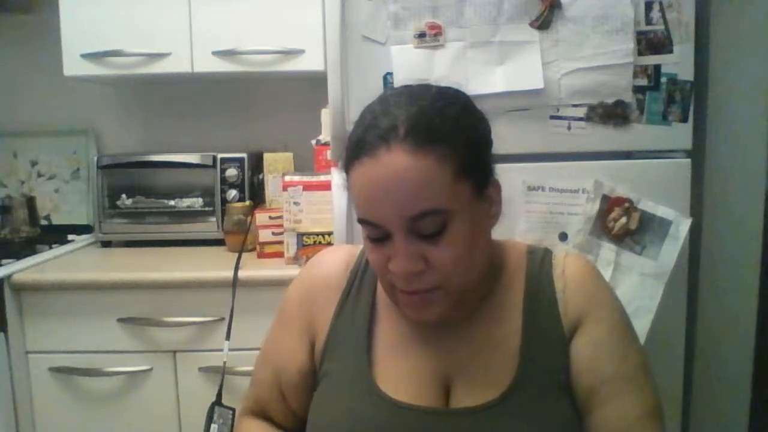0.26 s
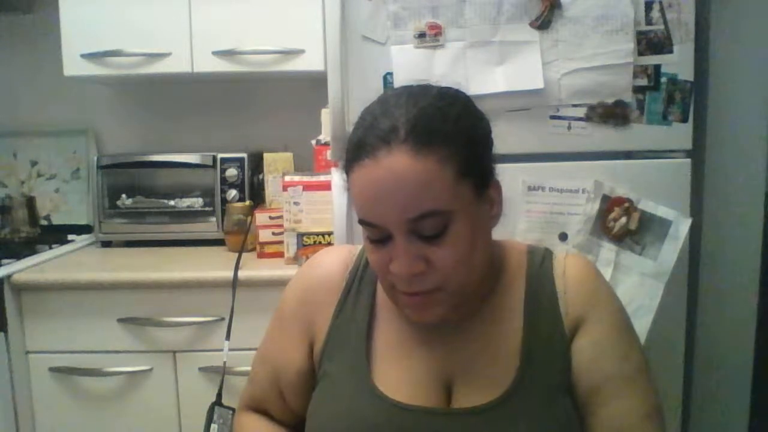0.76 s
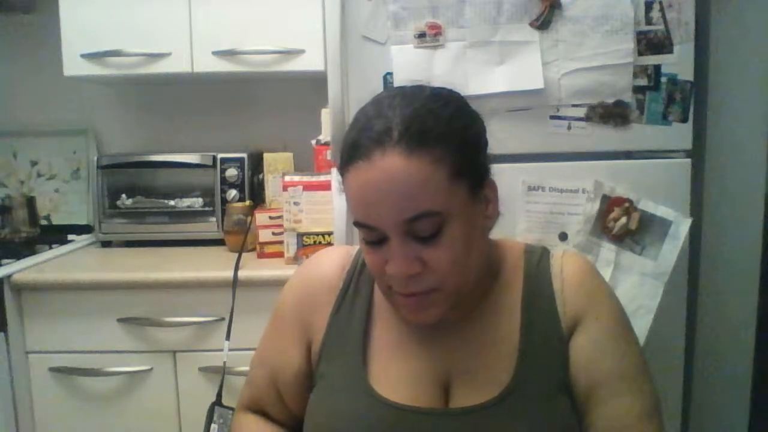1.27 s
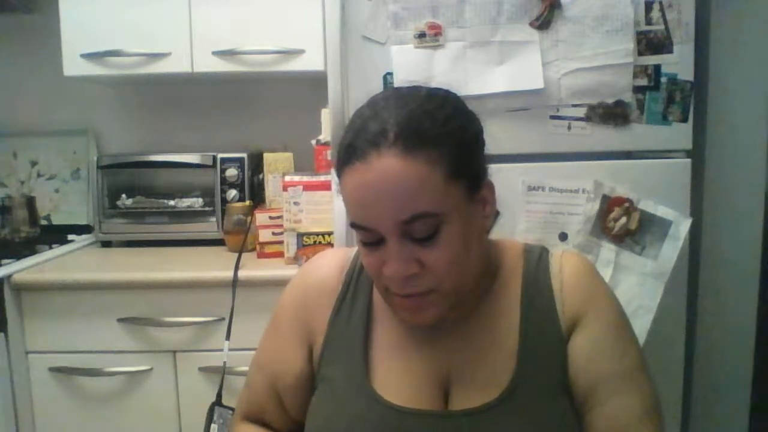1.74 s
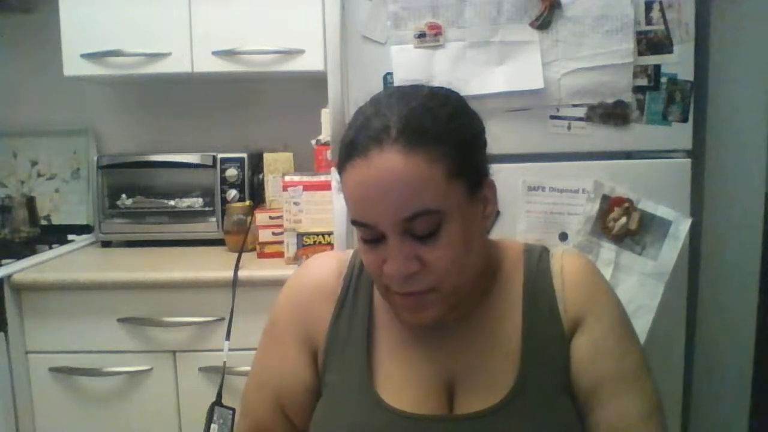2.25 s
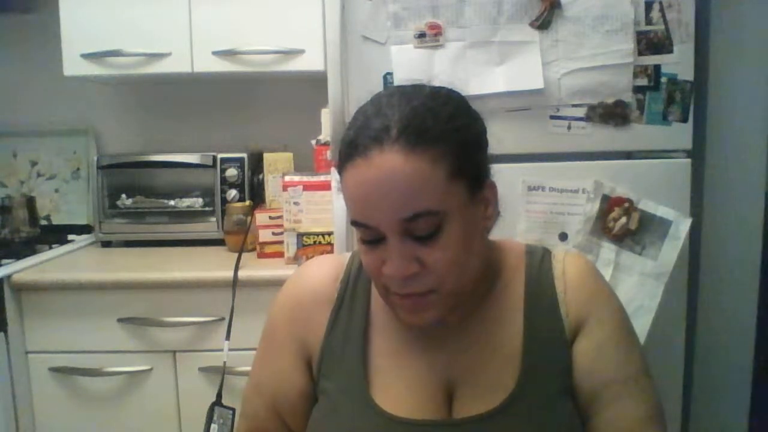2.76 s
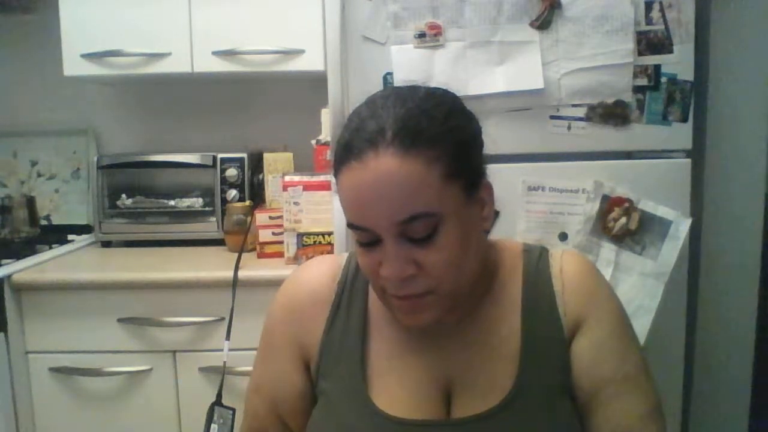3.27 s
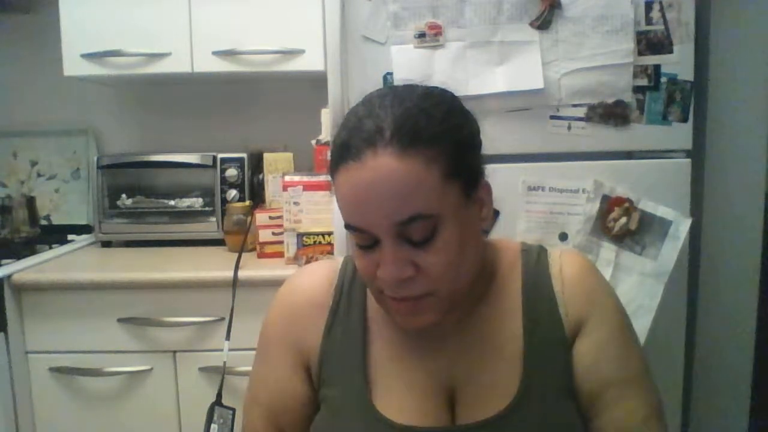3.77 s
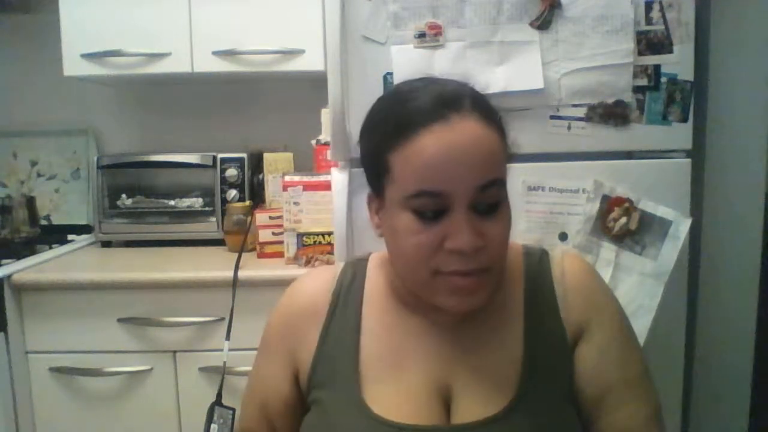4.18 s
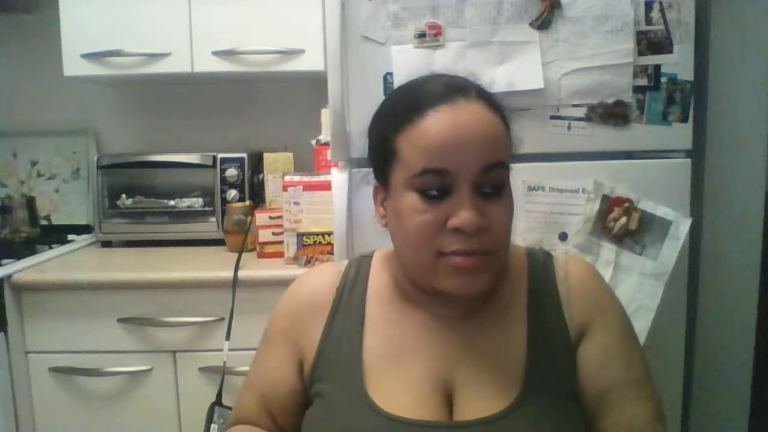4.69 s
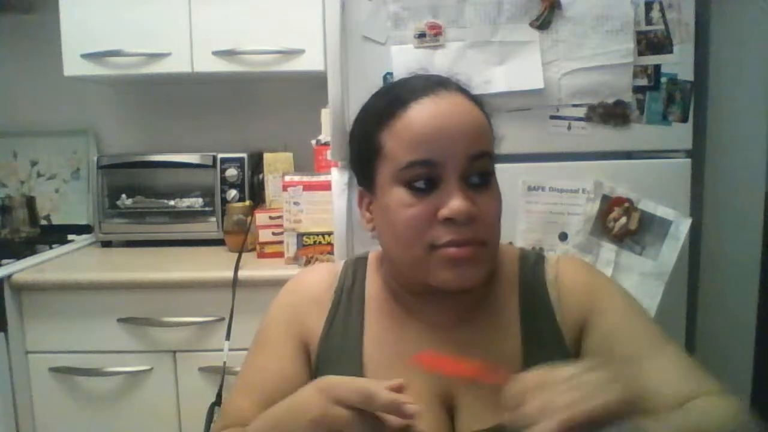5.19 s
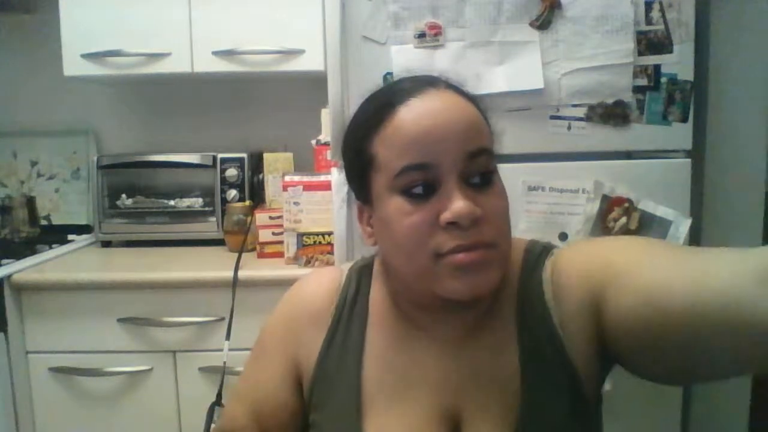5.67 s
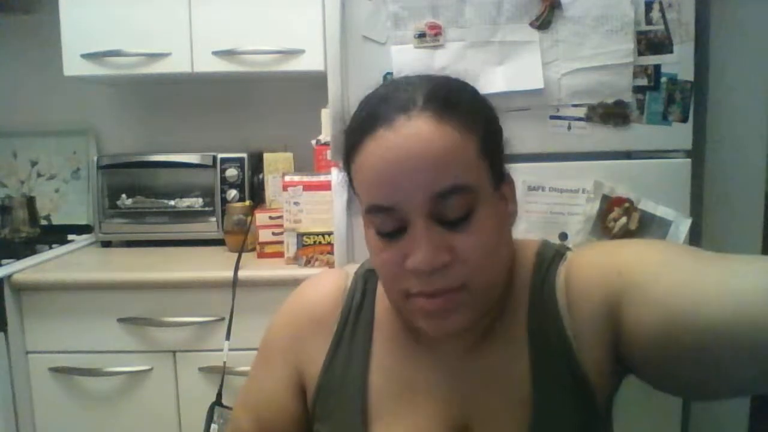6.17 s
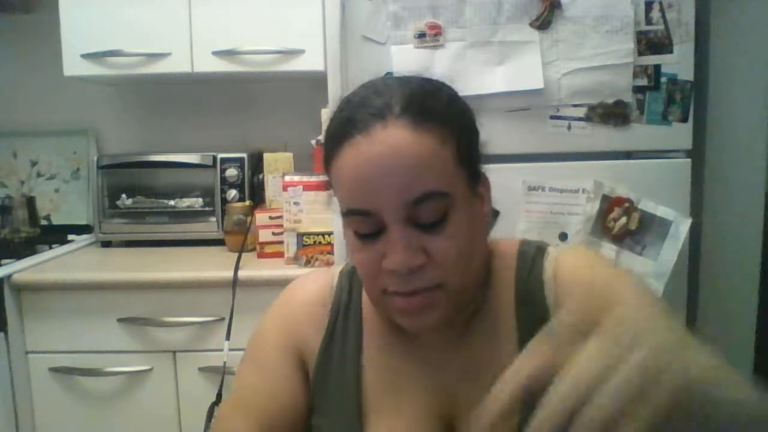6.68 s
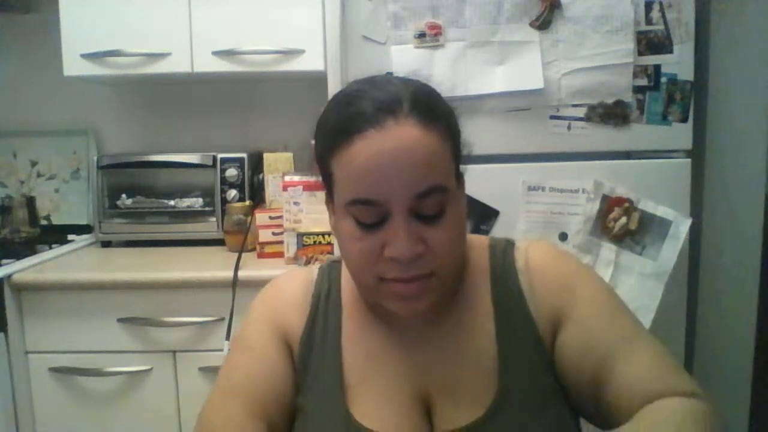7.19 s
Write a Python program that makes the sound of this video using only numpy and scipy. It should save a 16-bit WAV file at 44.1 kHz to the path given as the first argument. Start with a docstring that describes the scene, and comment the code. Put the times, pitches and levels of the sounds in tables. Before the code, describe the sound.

A faint steady whirr fills a small, fairly live kitchen, heard through a microphone with little treble. At first a scissor tip scratches lightly over a taped cardboard box, with a sharp tick at about 1.4 seconds. From 1.7 seconds the blade softly slits the tape, amid dull, hollow knocks on the box, and snips shut near 3 seconds. At 3.5 seconds the last strip pulls tight, then breaks at 3.7 with a snap and thump, the loudest moment. From 3.9 to 4.5 seconds the flaps are dragged open, juddering, squeaking and rasping. A lull follows. Around 6 seconds the scissors are laid aside, with low table thuds, small clicks and an arm brushing the surface. A flap clacks near 6.8 seconds and the box is knocked. From 6.9 seconds hands rummage in crackling paper packing while a cardboard fold creaks, until about 7.5 seconds.

```python
"""A small, fairly live kitchen with a faint steady whirr, heard through a microphone with little treble.
On the table, scissors slit the tape on a cardboard box; the last strip snaps, the flaps are dragged open.
The scissors are laid aside; then hands knock the box and rummage in its paper packing.
Rubbing is a stream of tiny slips as fibres catch and let go, each one shaking the card and the box.
Knocks, ticks and creaks are short blows that leave the card or the blades ringing."""
import sys
import numpy as np
from scipy import signal
from scipy.io import wavfile

SR = 44100
rng = np.random.default_rng(int(sys.argv[2]) if len(sys.argv) > 2 else 0)


def dump_mix(stems):
    """Bounce the given channels to the path in sys.argv[1] as a 16-bit WAV at rate SR."""
    frames = np.atleast_2d(stems).T  # one column per channel
    limited = np.clip(frames, -1, 1)  # hard clip at full scale
    pcm = np.round(limited * 32767).astype(np.int16)
    wavfile.write(sys.argv[1], SR, pcm)


N = 328090
TIME = np.arange(N) / SR
RING_TIME = np.arange(SR // 3) / SR  # seconds since a blow


def amp(db):
    """Turns decibels into a number to multiply a sound by."""
    return 10 ** (np.asarray(db) / 20)


def unit(x):
    """Scales a sound to an average (rms) size of 1."""
    return x / np.sqrt(np.mean(x ** 2) + 1e-20)


def read(points, hz):
    """Looks up a pitch in a table, blending between rows on a musical (log) scale."""
    pitches, values = np.transpose(points)
    return np.interp(np.log(hz + 1), np.log(pitches + 1), values)


def add(mix, start_s, sound):
    """Mixes a sound in at the given time."""
    part = mix[max(round(start_s * SR), 0):][:len(sound)]
    part += sound[:len(part)]


def colour(x, tone, size=4096):
    """Makes each pitch louder or softer, following rows of pitch in Hz and gain in dB."""
    hz = abs(np.fft.fftfreq(size, 1 / SR))
    log_gain = np.log(amp(np.maximum(read(tone, hz), -100)))
    response = np.exp(np.conj(signal.hilbert(log_gain)))  # rings after a click, never before it
    taps = np.fft.ifft(response).real[:size // 2]
    return signal.oaconvolve(x, taps)[:len(x)]


def wander(length, turns_per_s):
    """A random curve that glides up and down, with an average size of 1."""
    points = rng.standard_normal(4096)
    return unit(np.interp(np.arange(length) / SR * turns_per_s, np.arange(len(points)), points))


def ring(modes, rise_s):
    """A struck thing sounds a few tones (modes); each drops 60 dB over its ring time."""
    wave = sum(amp(db - 60 * RING_TIME / ring_s) * np.sin(2 * np.pi * (hz * RING_TIME + k / np.e))
               for k, (hz, db, ring_s) in enumerate(modes))
    wave = wave * (1 - np.exp(-(RING_TIME / rise_s) ** 2))
    return wave / abs(wave).max()


def strike(blows, modes, focus_db, rise_s, detune=0.038, spot_db=3):
    """Each blow rings an object; its tones lose focus_db per octave away from the favoured pitch."""
    out = np.zeros(N)
    hz, mode_db, ring_s = np.transpose(modes)
    for start, db, favoured_hz in blows:
        grip, spot = rng.standard_normal((2, len(modes)))  # how it is held, where it is hit
        weight_db = mode_db + spot_db * spot - abs(focus_db * np.log2(hz / favoured_hz))
        add(out, start, amp(db) * ring(zip(hz * (1 + detune * grip), weight_db, ring_s), rise_s))
    return out


def envelope(t, start, swell, hold, fade_db_per_s):
    """The hand builds up pressure, keeps it, and eases off."""
    age = t - start
    rising = np.clip(age / max(swell, 1 / SR), 0, 1) ** 2
    return rising * amp(-fade_db_per_s * np.maximum(age - swell - hold, 0))


def span(rows, fade_db_per_s):
    """The times from the first stroke until the last has faded by 60 dB."""
    start, swell, hold = np.transpose(rows)[:3]
    end = max(start + swell + hold) + 60 / fade_db_per_s
    return TIME[max(round(min(start) * SR), 0):round(end * SR)]


def table_echo(x):
    """An echo off the table top; its delay drifts as the point of contact moves."""
    t = np.arange(len(x)) / SR
    delay_s = .0014 * (1 + .12 * wander(len(x), 11))
    return x + .6 * np.interp(t - delay_s, t, x)


def bend(x, flex):
    """Card bending under the hand shifts its pitches by the small fraction flex."""
    t = np.arange(len(x)) / SR
    shift_s = np.cumsum(flex * wander(len(x), 14)) / SR
    return np.interp(t + shift_s, t, x, period=len(x) / SR)


# The hiss of fibres and the boom of the hollow box. Each row: pitch in Hz, strength in dB.
HISS_TONE = [(2000, -19), (3300, -1), (4300, -0.5), (5500, -0.5), (6800, -4), (8000, -4.5)]
BOOM_TONE = [(90, -50.5), (170, -19.5), (232, 5.5), (265, -4.5), (305, 4), (360, 4.5), (412, 8.5),
             (470, -9.5), (540, -14.5), (900, -53)]
def rub(rows, tone, fade_db_per_s, slips_per_s, spread_db, smooth, clump_db, flex=0,
        judder=0, judder_hz=200, hiss_tone=HISS_TONE, boom_db_per_s=0, boom_db_per_octave=0):
    """Fibres catch and let go in clumps; the slips make the card scrape, the box boom and a fine hiss."""
    t = span(rows, fade_db_per_s)
    slipping = rng.random(len(t)) < slips_per_s / SR
    size = amp(spread_db * np.minimum(rng.exponential(1, len(t)), 3))
    noise = rng.standard_normal(len(t))
    drive = unit(unit(slipping * np.sign(noise) * size) + smooth * noise)
    # an edge that sticks and slips bunches the sound into uneven pulses
    cycles = np.cumsum(judder_hz * (1 + 0.245 * wander(len(t), 70))) / SR
    pulses = np.exp(judder * np.cos(2 * np.pi * cycles))
    clumps = amp(clump_db * wander(len(t), 79.45))
    drive = table_echo(drive * pulses * clumps)
    power = np.zeros((3, len(t)))
    for start, swell, hold, level_db, boom_db, hiss_db in rows:
        scrape = amp(level_db) * envelope(t, start, swell, hold, fade_db_per_s)
        # a lifting flap lets out more and more of the boom
        boom = scrape * amp(boom_db + boom_db_per_s * np.clip(t - start - swell, 0, hold))
        power += np.square([scrape, boom, scrape * amp(hiss_db)])
    # an open box booms higher than a closed one
    boom_tone = [(hz, db + boom_db_per_octave * np.log2(hz / BOOM_TONE[0][0])) for hz, db in BOOM_TONE]
    voices = bend(colour(drive, tone), flex), colour(drive, boom_tone), colour(drive, hiss_tone)
    out = np.zeros(N)
    add(out, t[0], sum(unit(voice) * np.sqrt(p) for voice, p in zip(voices, power)))
    return out


def resonate(x, hz, width_hz):
    """Keeps a narrow band around a moving pitch: shift it down to zero, smooth twice, shift back."""
    turn = np.exp(2j * np.pi * np.cumsum(hz) / SR)
    r = np.exp(-np.pi * width_hz / SR)
    return (turn * signal.lfilter([(1 - r) ** 2], [1, -2 * r, r * r], x / turn)).real


def sing(rows, notes, fade_db_per_s, sag_per_s=0):
    """Rubbing feeds a few narrow notes, which can sag in pitch as the edge slides on."""
    out = np.zeros(N)
    for row in rows:
        start, swell, hold, level_db, pitch = row
        t = span([row], fade_db_per_s)
        noise = rng.standard_normal(len(t))
        glide = pitch * np.exp(-sag_per_s * (t - start))
        sound = unit(sum(amp(db) * unit(resonate(noise, hz * glide, width)) for hz, width, db in notes))
        add(out, t[0], sound * amp(level_db) * envelope(t, start, swell, hold, fade_db_per_s))
    return out


# The kitchen's steady air. Each row: pitch in Hz, strength in dB.
AIR_TONE = [(25, 0), (50, -53), (85, 4.5), (150, -2.5), (230, -0.5), (400, -7), (600, -8.5), (800, -8),
            (890, 2.5), (1080, -8.5), (1300, -6), (1900, -16), (3000, -24.5), (7000, -27)]
def air():
    """A faint, slightly wavering whirr."""
    return amp(-54) * unit(colour(rng.standard_normal(N), AIR_TONE)) * amp(.6 * wander(N, 21))


# How long the room echoes. Each row: pitch in Hz, seconds to fade by 60 dB.
ECHO_TIMES = [(150, 0.1), (400, 0.24), (1040, 0.2), (2760, 0.23), (7000, 0.17)]
def kitchen(x, echo_db):
    """Adds dense echoes from walls and cupboards, each pitch dying at its own speed."""
    echoes, slot = np.zeros(SR // 2), 12  # one echo in every 12 samples
    at = np.arange(0, len(echoes) - slot, slot)
    echoes[at + rng.integers(0, slot, len(at))] = rng.choice([-1, 1], len(at))
    hz, t, spectrum = signal.stft(echoes, SR, nperseg=256)
    fade = amp(-60 * t / read(ECHO_TIMES, hz)[:, None])
    tail = signal.istft(spectrum * fade, SR, nperseg=256)[1]
    out = x.copy()
    add(out, .004, amp(echo_db) * signal.fftconvolve(x, tail / np.linalg.norm(tail)))
    return out / np.hypot(1, amp(echo_db))


# Thuds of the table top. Each row: start in seconds, level in dB, pitch in Hz.
THUDS = [(3.652, -28, 120.4), (4.292, -29, 105), (4.447, -41.5, 124.4), (5.983, -28, 120),
         (6.032, -24.5, 85.4), (6.103, -35, 99), (6.436, -30.5, 83), (6.487, -35.5, 89.3)]
def table_thuds():
    """Weight shifting on the table makes its top sway at a low pitch."""
    out = np.zeros(N)
    for start, db, hz in THUDS:
        add(out, start, amp(db) * ring([(hz, 0, .25), (hz * 1.6, -10, .12)], rise_s=.014))
    return out


# Sweeps of an arm. Each row: start, swell and hold in seconds, scrape level in dB, then boom and
# hiss in dB compared with the scrape. All the STROKES tables are laid out this way.
ARM_STROKES = [(5.895, 0.039, 0.11, -46, 4.5, -9.5), (6.02, 0.012, 0.013, -43.5, 3.5, 1),
               (6.068, 0.02, 0.0065, -28.5, -5, -10.5), (6.185, 0.027, 0.057, -42.5, -19.5, 7),
               (6.22, 0.0035, 0.044, -36, -19, -16), (6.315, 0.013, 0.068, -41.5, 7.5, 0),
               (6.66, 0.042, 0.056, -47.5, 1, -0.5), (6.74, 0.0056, 0.019, -28.5, 1, -5)]
# The rubbed table. Each row, as in all TONE tables: pitch in Hz, strength in dB.
TABLE_TONE = [(400, -34), (560, -7.5), (710, 6.5), (843, -23), (1050, 4), (1400, 0.5), (1850, 4),
              (2300, -4), (3400, -15.5), (4400, -63)]
def arm_brush():
    """An arm brushes over the table."""
    return rub(ARM_STROKES, TABLE_TONE, fade_db_per_s=480, slips_per_s=800, spread_db=3,
               smooth=.3, clump_db=2, flex=.04)


# Hands moving in the packing, and the tone of its paper.
PAPER_STROKES = [(6.907, 0.024, 0.14, -30, 3, -5.5), (7.05, 0.027, 0.1, -25.5, -1, -6.5),
                 (7.2, 0.0077, 0.068, -32.5, -8, -6.5), (7.255, 0.021, 0.058, -27.5, 0.5, -5.5),
                 (7.355, 0.013, 0.072, -34, 1.5, -1)]
PAPER_TONE = [(320, -40.5), (550, -8), (686, -0.5), (781, -11.5), (856, -15.5), (959, -33), (1030, 0.5),
              (1170, -4.5), (1360, -2.5), (1780, -7.5), (1930, -7), (2920, -10.5), (3400, -20), (4420, -68)]
def paper_packing():
    """Paper crackles as hands rummage in it."""
    return rub(PAPER_STROKES, PAPER_TONE, fade_db_per_s=350, slips_per_s=950, spread_db=3.3,
               smooth=.22, clump_db=1.9, flex=.022)


# Dull knocks. Each row, as in all BLOWS tables: start in seconds, level in dB, favoured pitch in Hz.
BOX_BLOWS = [(0.552, -26.5, 404), (1.441, -24.5, 387), (1.713, -32, 395), (2.165, -22, 310),
             (2.482, -31, 237), (2.667, -20.5, 407), (2.764, -24.5, 415), (2.932, -23, 250),
             (2.995, -21.5, 407), (3.337, -33.5, 422), (3.482, -9, 320), (3.556, -14, 260),
             (3.608, -13, 234), (3.655, -6, 222), (3.707, -7, 314), (4.158, -23.5, 395),
             (4.297, -22.5, 390), (5.936, -29, 303), (5.987, -19.5, 224), (6.745, -20, 315),
             (6.766, -22.5, 507), (6.8854, -11, 317)]
# The ringing box. Each row, as in all MODES tables: pitch in Hz, level in dB, ring time in seconds.
BOX_MODES = [(190, -13, .08), (240, 1, .12), (290, -1, .07), (345, -7, .05), (412, -1, .11),
             (660, -16, .06), (1360, -17, .07)]
def box_knocks():
    """Each blow dents a patch of card, which swings briefly at its own pitch; the box rings after it."""
    out = amp(-4) * strike(BOX_BLOWS, BOX_MODES, focus_db=9, rise_s=.003, detune=.035)
    dent_ring_s = 0.048
    for start, db, hz in BOX_BLOWS:
        dent = ring([(hz, 0, dent_ring_s), (hz * 2.1, -13, dent_ring_s / 2)], rise_s=0.0037)
        add(out, start, amp(db) * dent)
    return colour(out, [(60, -19.5), (190, -1)])  # the knocks carry little deep bass


# When a wall hums. Each row, as in all SONG tables: start, swell and hold in seconds, level in dB,
# and a number that multiplies the pitch.
WALL_SONG = [(1.79, 0.025, 0.19, -48, 0.55), (1.9, 0.036, 0.23, -48, 0.89),
             (2.32, 0.015, 0.19, -52.5, 0.63), (3.272, .012, 0.076, -39.5, 1.03),
             (4.61, 0.026, .19, -49.5, 0.48)]
# The wall's note. Each row, as in all NOTES tables: pitch in Hz, width in Hz, level in dB.
WALL_NOTES = [(410, 75, 0)]
def wall_hum():
    """A wall of the box hums as it is rubbed."""
    return sing(WALL_SONG, WALL_NOTES, fade_db_per_s=199)


# The jerks of a fold, and the ringing of its creased card.
FOLD_BLOWS = [(7.1095, -7, 1650), (7.118, -7.5, 1000), (7.134, -9, 1350), (7.155, -11, 1500),
              (7.179, -17, 1300), (7.191, -17, 1500)]
FOLD_MODES = [(992, -0.5, .1), (1126, -5.5, .02), (1367, 1, 0.037), (1625, 1, 0.023), (1980, 1.5, 0.017)]
def fold_creaks():
    """A fold of the box gives way in quick jerks, each ringing the card."""
    return strike(FOLD_BLOWS, FOLD_MODES, focus_db=9, rise_s=.0012, detune=.015, spot_db=1)


# The slaps of a flap, and how it rings.
FLAP_BLOWS = [(6.5886, -44.5, 1380), (6.6884, -29.5, 1340), (6.746, -15, 1490), (6.7651, -10.5, 1450)]
FLAP_MODES = [(1357, 1, .028), (1480, -3, .025), (2000, -13, .03), (2607, -8, .025), (3544, -14, .03),
              (4530, -15, .025)]
def flap_slaps():
    """A stiff flap slaps and rings with a short clack."""
    return strike(FLAP_BLOWS, FLAP_MODES, focus_db=1.5, rise_s=0.0029, spot_db=1.5)


# The dragging of the flaps, their tone, and the duller hiss of soft card on card.
FLAP_STROKES = [(3.865, 0.026, 0.027, -39, -4, -3), (3.925, 0.052, 0.1634, -26.5, -16.5, -14)]
FLAP_TONE = [(320, -38.5), (500, -27.5), (600, -3), (750, -11), (900, -4), (1020, -10.5), (1200, -23),
             (1340, 5.5), (1500, 0.5), (1750, 4.5), (1910, -15), (2020, 1), (2200, -6), (2750, -9.5),
             (3400, -12.5), (4420, -52)]
DULL_HISS_TONE = [(2000, -42), (3300, -3.5), (4000, 2), (4700, -1.5), (6200, -9), (7200, -8)]
# When the flaps squeak, and on which notes.
SQUEAK_SONG = [(3.94, 0.013, 0.0082, -23.5, 1.02), (3.997, 0.0077, 0.02, -23, 1)]
SQUEAK_NOTES = [(1423, 100, 0), (1665, 140, -7), (2680, 220, -3), (4850, 100, -14), (5540, 150, -16)]
def flap_drag():
    """The flaps stick and slip past each other, juddering and squeaking."""
    drag = rub(FLAP_STROKES, FLAP_TONE, fade_db_per_s=689, slips_per_s=3200, spread_db=4,
               smooth=0.25, clump_db=1.0, judder=1.6, judder_hz=190,
               hiss_tone=DULL_HISS_TONE, boom_db_per_s=90.5, boom_db_per_octave=10)
    return drag + sing(SQUEAK_SONG, SQUEAK_NOTES, fade_db_per_s=651, sag_per_s=0.43)


# Card sliding on card, and its tone.
SLIDE_STROKES = [(4.19, 0.093, .02, -40, -2.5, -12), (4.268, 0.033, 0.15, -30, -8, -4.5),
                 (4.449, 0.0011, 0.014, -29.5, 1, -5)]
SLIDE_TONE = [(400, -38.5), (560, -17), (700, 0.5), (850, -10.5), (1020, 2.5), (1180, -5.5), (1400, 3),
              (1700, -1.5), (2100, -2.5), (2550, -3), (3400, -12.5), (4400, -62)]
# When a flap's edge rasps, and on which notes.
RASP_SONG = [(3.878, .012, 0.06, -42.5, 1.3), (4.05, 0.021, 0.07, -28.5, 1.03),
             (4.225, 0.044, 0.038, -35.5, 1)]
RASP_NOTES = [(1383, 100, 1.5), (1737, 22, 0), (1942, 69, -1)]
def flap_slide():
    """Card slides over card, and a flap's edge rasps along its neighbour."""
    slide = rub(SLIDE_STROKES, SLIDE_TONE, fade_db_per_s=420, slips_per_s=1000, spread_db=2.5,
                smooth=.25, clump_db=1.2, flex=.02)
    return slide + sing(RASP_SONG, RASP_NOTES, fade_db_per_s=647, sag_per_s=0.17)


# Snaps of tape and creases. Each row: start in seconds, level in dB, centre pitch in Hz,
# and the drop on both sides of that pitch in dB per octave.
SNAPS = [(0.552, -39.5, 680, 22), (1.29, -45.5, 1190, 31), (1.434, -42, 910, 4), (1.445, -27.5, 1780, 5),
         (1.46, -26.5, 725, 9.5), (1.693, -45, 850, 24), (2.589, -45, 1140, 30), (3.391, -44, 1320, 37),
         (3.483, -27.5, 650, 19), (3.658, -23.5, 1990, 8.5), (3.672, -21, 797, 19), (3.967, -32, 1710, 27),
         (4.302, -25.5, 1700, 25), (4.342, -28.5, 1900, 13), (4.451, -20.5, 1300, 22),
         (4.555, -46.5, 3500, 5), (5.388, -47, 1217, 28), (6.013, -38.5, 5200, 27), (6.077, -37, 5270, 23),
         (6.247, -36, 5680, 28), (6.279, -37.5, 5680, 24), (6.319, -40, 5160, 16), (6.374, -35.5, 5350, -2),
         (6.589, -38.5, 1288, 57), (6.747, -44, 1420, 11), (6.93, -30.5, 1480, 31),
         (6.934, -34.5, 3330, 32), (7.282, -57, 2800, 6), (7.297, -24.5, 810, 16)]
def snaps():
    """A sharp release and a moment of splintering, coloured by the patch of card or tape that lets go."""
    out, bands = np.zeros(N), np.geomspace(60, 8000, 60)
    shared_db = read([(60, -14.0), (250, 6), (7000, -3.5), (8000, -37.5)], bands)
    for start, db, hz, drop_db in SNAPS:
        splinters = 0.5 * rng.standard_normal(len(RING_TIME)) * amp(-60 * RING_TIME / 0.036)
        splinters[0] = 1  # the release itself
        shape_db = shared_db - abs(drop_db * np.log2(bands / hz))
        crack = colour(splinters, np.column_stack([bands, shape_db]))
        add(out, start, amp(db) * crack / np.linalg.norm(crack) * np.sqrt(.01 * SR))  # level over 10 ms
    return out


# Taps of the scissors, and the ringing of the whole tool.
TICK_BLOWS = [(0.5362, -30, 2400), (1.4335, -20, 1700), (1.4443, -14, 1800), (1.7225, -33, 3600)]
SCISSOR_MODES = [(845, -3, .03), (1520, 0, .02), (1640, -9, .07), (2450, -7, .025), (2750, -13, .04),
                 (3550, -6, .028), (5600, -18, .07), (6500, -6, .014)]
def scissor_ticks():
    """The scissors tick against the card and ring briefly."""
    return strike(TICK_BLOWS, SCISSOR_MODES, focus_db=8, rise_s=0.0004, detune=0.02, spot_db=1.5)


# Clicks of the closing blades, and their high ringing.
SNIP_BLOWS = [(2.8589, -37.5, 6300), (2.9867, -19, 6300), (3.003, -24.5, 6300)]
BLADE_MODES = [(4900, -16.5, 0.021), (5940, -3, 0.021), (6640, 9, 0.011), (7010, -10, 0.02),
               (7220, 4, 0.014)]
def scissor_snips():
    """The blades click shut and bounce many times in a few milliseconds, thickening the ring."""
    clicks = strike(SNIP_BLOWS, BLADE_MODES, focus_db=2, rise_s=0.0003, spot_db=2)
    t = RING_TIME[:SR // 20]
    bounces = rng.standard_normal(len(t)) * np.exp(-t / 0.003)
    return clicks + 0.6 * signal.oaconvolve(clicks, bounces / np.linalg.norm(bounces))[:N]


# Light strokes of the blade's tip, and their tone.
TIP_STROKES = [(.01, 0.12, 0.042, -49, 4.5, -9.5), (.26, 0.0089, 0.16, -63, 9.5, -4),
               (.43, 0.15, 0.013, -42, -2, -15), (.82, 0.079, 0.02, -54, -2, -4)]
TIP_TONE = [(400, -45), (650, -8), (829, -17), (930, -3.5), (1040, -9), (1180, -23), (1400, -7),
            (1900, -20), (3300, -22), (4400, -72)]
# When, and on which notes, the tip sings on the tape and scratches the card.
TIP_SONG = [(0.0013, .005, 0.15, -49, 0.96)]
TIP_NOTES = [(1055, 53, 0), (856, 35, -8)]
SCRATCH_SONG = [(.548, 0.0093, 0.025, -54, 0.97), (.893, 0.0055, 0.016, -46.5, 0.98)]
SCRATCH_NOTES = [(1620, 80, 3), (3570, 280, -2), (6520, 610, -8)]
def blade_tip():
    """The tip feels for the seam, rubbing over tape and card."""
    scrape = rub(TIP_STROKES, TIP_TONE, fade_db_per_s=171, slips_per_s=1900, spread_db=4.0,
                 smooth=0.84, clump_db=5.5)
    scratch = sing(SCRATCH_SONG, SCRATCH_NOTES, fade_db_per_s=400)
    return scrape + scratch + sing(TIP_SONG, TIP_NOTES, fade_db_per_s=116)


# The cuts along the seam, and the tone of the tape.
SLIT_STROKES = [(1.68, 0.024, 0.027, -47.5, 2.5, -8), (1.7, 0.35, 0.2, -40, -3, -15.5),
                (2.05, 0.12, 0.011, -32, -1, -10), (2.62, 0.038, 0.32, -53.5, 0.5, -11.5),
                (3.13, 0.04, 0.062, -51.5, 2.5, -15), (3.25, 0.028, 0.46, -59, 7, -14)]
TAPE_TONE = [(320, -60.5), (550, -55.5), (641, 1.5), (718, 5), (775, -3.5), (917, -13), (997, -19.5),
             (1360, 8.5), (1570, -15.5), (1810, -2), (2090, -7), (2300, -6.5), (2510, -9), (3200, -14.5),
             (3400, -11), (4420, -75.5)]
# When the blade's edge sings, and on which notes.
BLADE_SONG = [(2.65, 0.089, 0.21, -53.5, 1)]
BLADE_NOTES = [(1450, 35, 0), (2060, 60, -4), (2470, 70, -10), (2820, 60, -12), (3440, 45, -12),
               (4060, 45, -16)]
def tape_slit():
    """The blade slits the tape in tiny slips, and its edge sings as it rubs."""
    slit = rub(SLIT_STROKES, TAPE_TONE, fade_db_per_s=210, slips_per_s=700, spread_db=3.5,
               smooth=.2, clump_db=2.5, flex=.012)
    return slit + sing(BLADE_SONG, BLADE_NOTES, fade_db_per_s=96)


# The pull on the last strip, its rip, and the tone of that rip.
PULL_STROKES = [(3.481, .003, .02, -30.5, -1, -0.5), (3.5, 0.034, 0.077, -28, -1, -6)]
RIP_STROKES = [(3.651, .006, 0.04, -21.5, -1, -1.5)]
RIP_TONE = [(320, -24.5), (550, 3), (650, 3.5), (850, 4.5), (1030, -9.5), (1350, -0.5), (1670, 2),
            (1950, 4.5), (2510, -3.5), (3400, -16.5), (4420, -63.5)]
def tape_rip():
    """The last strip is pulled tight and rips."""
    pull = rub(PULL_STROKES, SLIDE_TONE, fade_db_per_s=603.5, slips_per_s=2200, spread_db=1.0,
               smooth=0.25, clump_db=-0.5)
    rip = rub(RIP_STROKES, RIP_TONE, fade_db_per_s=450, slips_per_s=2200, spread_db=4,
              smooth=.5, clump_db=1.2)
    return pull + rip


# The two cracks of the breaking strip, and the ringing of tight tape.
BURST_BLOWS = [(3.6494, .5, 2400), (3.6508, -6, 5000)]
TAPE_MODES = [(1250, -8, .012), (2400, 0, .01), (3300, -6, .008), (5100, -7, .009), (6500, -6, .012)]
def tape_burst():
    """The tight strip bursts and rings for an instant."""
    return strike(BURST_BLOWS, TAPE_MODES, focus_db=2, rise_s=.0001, detune=.02, spot_db=1)


def scene():
    """Rubbing, slaps and snaps fill the room; the other blows reach the microphone with less echo."""
    cutting = blade_tip() + tape_slit() + tape_rip() + wall_hum()
    opening = flap_drag() + flap_slide() + arm_brush() + paper_packing()
    roomy = cutting + opening + flap_slaps() + snaps()
    near = box_knocks() + table_thuds() + tape_burst() + fold_creaks() + scissor_ticks() + scissor_snips()
    return (kitchen(roomy, echo_db=-2) + kitchen(near, echo_db=-4.5) + air())[None]


# What the microphone lets through. Each row: pitch in Hz, gain in dB.
MICROPHONE_TONE = [(20, 0.5), (6700, -0.5), (7200, -7.5), (7600, -20), (8000, -37.5)]
def record(dry):
    """The microphone overloads just under full scale and passes little above 7 kHz."""
    heard = colour(np.clip(dry[0], -.95, .95), MICROPHONE_TONE)
    treble_cut = signal.firwin(255, 8290, window="blackman", fs=SR)  # cuts off at 8290 Hz
    return signal.oaconvolve(heard, treble_cut, "same")[None]


dry = scene()
out = record(dry)
dump_mix(out)
```